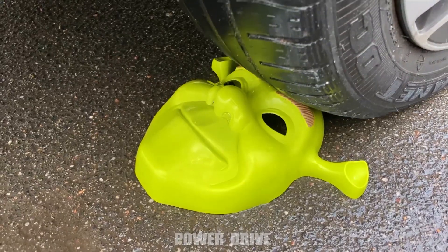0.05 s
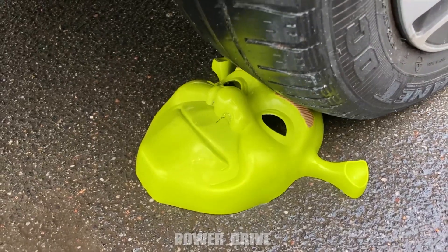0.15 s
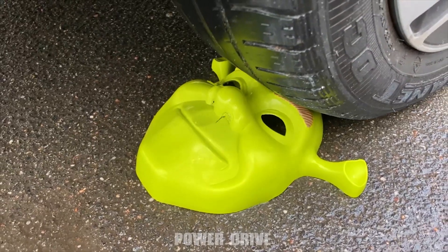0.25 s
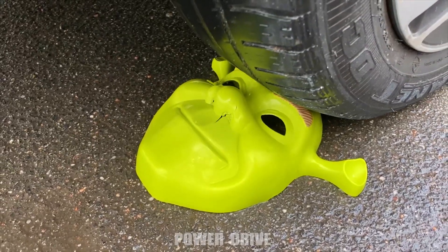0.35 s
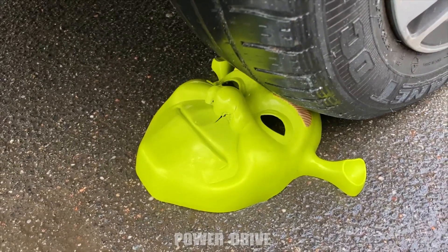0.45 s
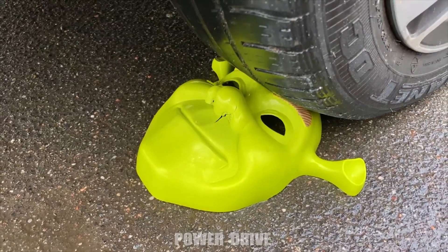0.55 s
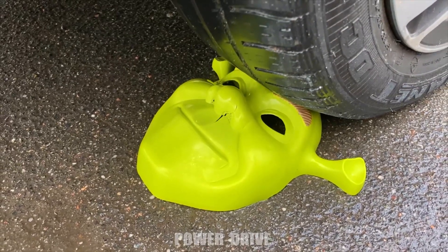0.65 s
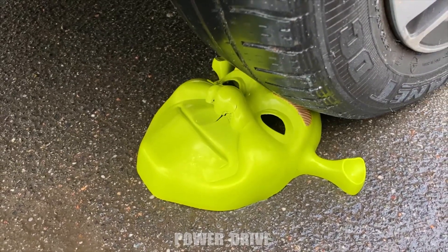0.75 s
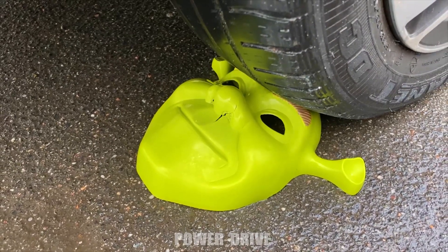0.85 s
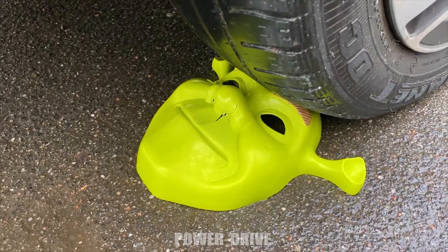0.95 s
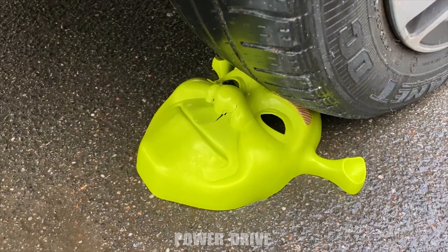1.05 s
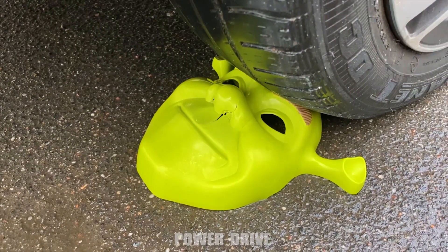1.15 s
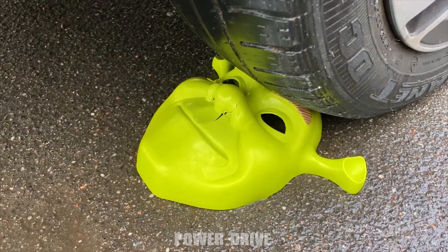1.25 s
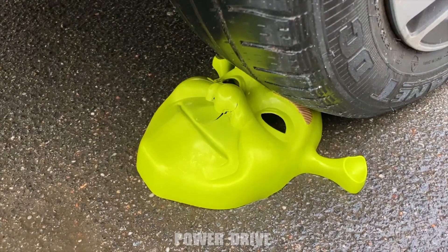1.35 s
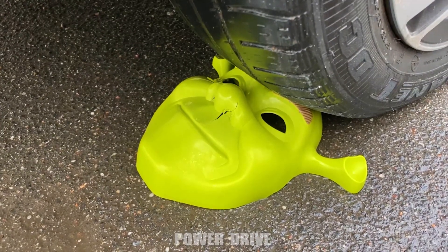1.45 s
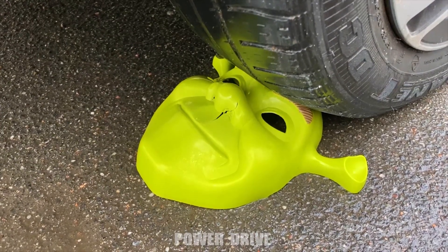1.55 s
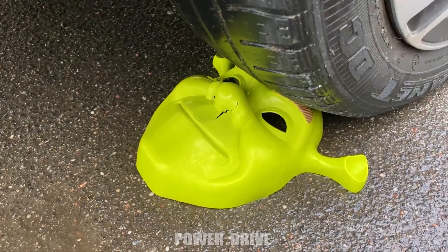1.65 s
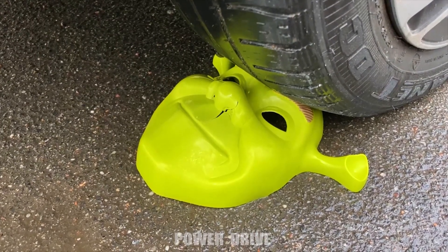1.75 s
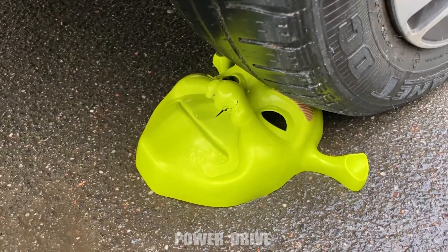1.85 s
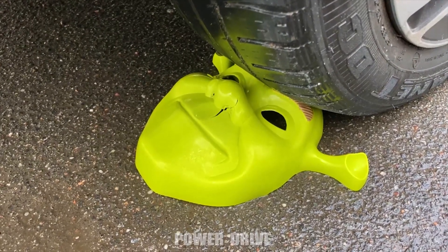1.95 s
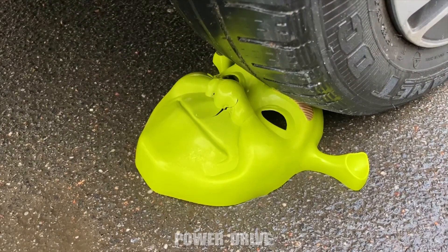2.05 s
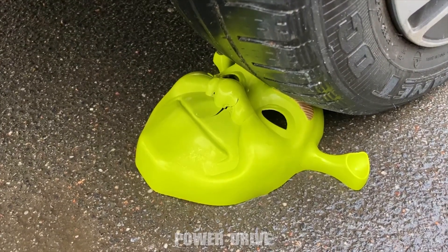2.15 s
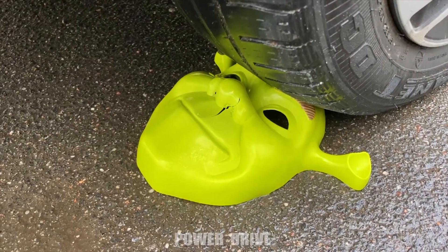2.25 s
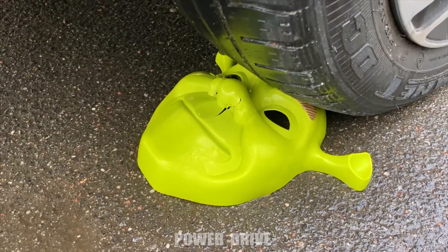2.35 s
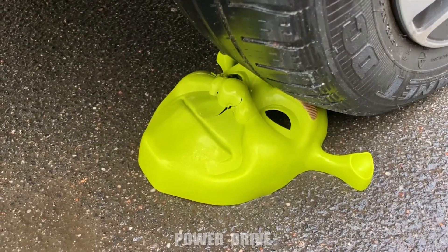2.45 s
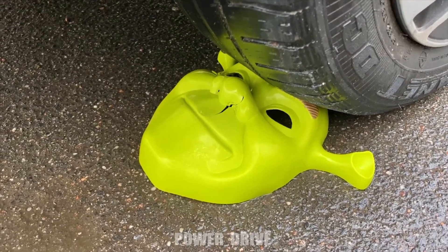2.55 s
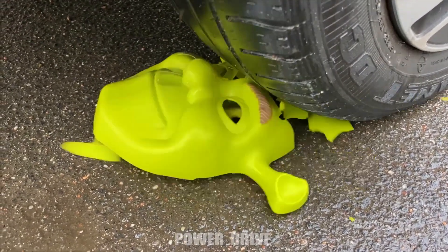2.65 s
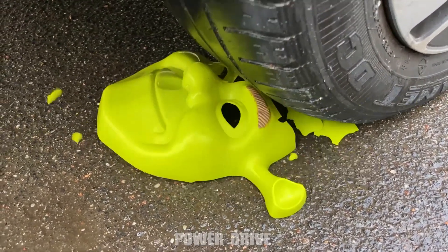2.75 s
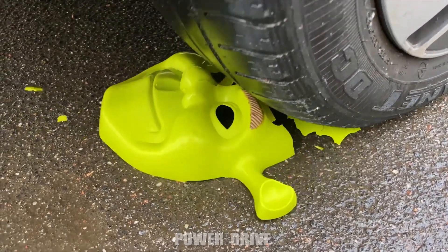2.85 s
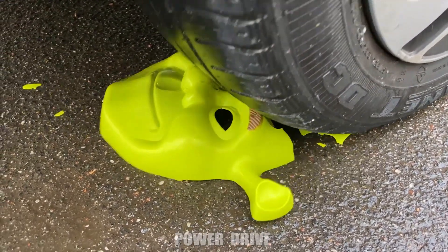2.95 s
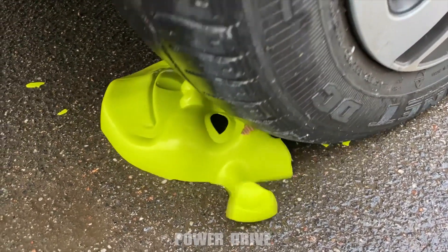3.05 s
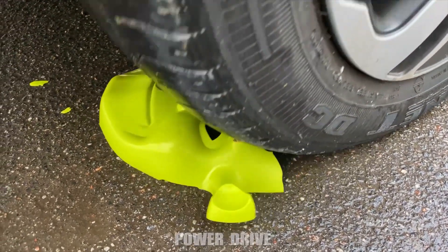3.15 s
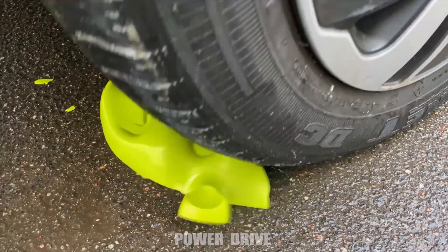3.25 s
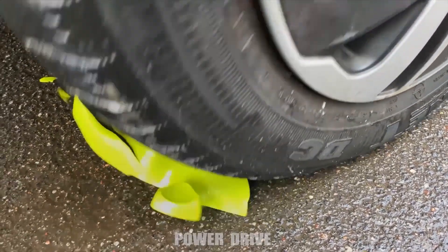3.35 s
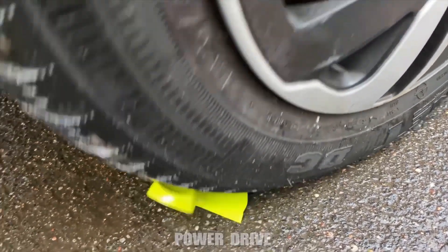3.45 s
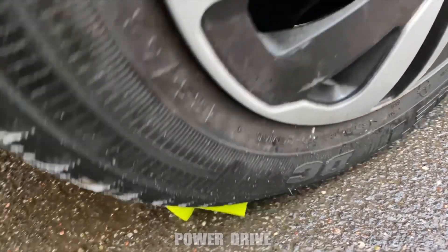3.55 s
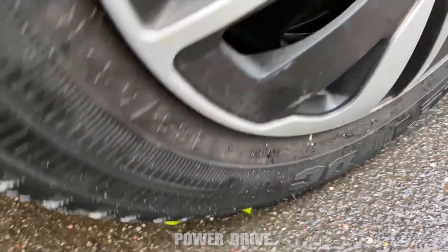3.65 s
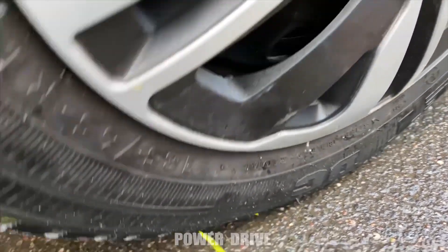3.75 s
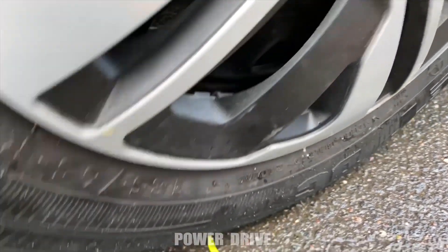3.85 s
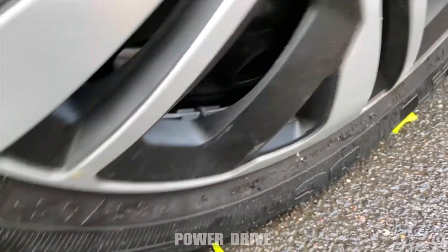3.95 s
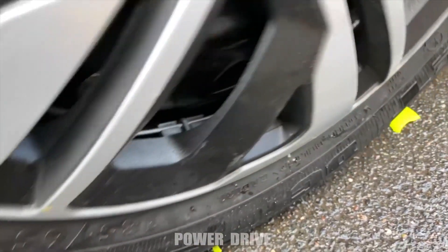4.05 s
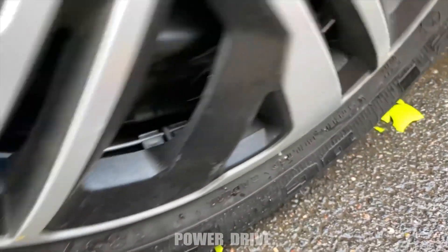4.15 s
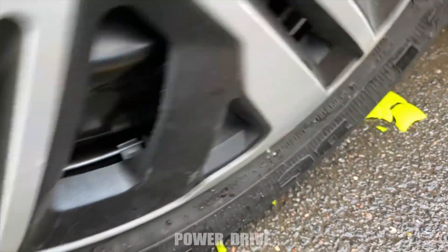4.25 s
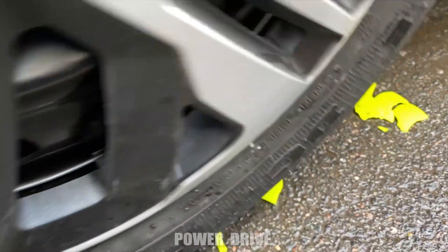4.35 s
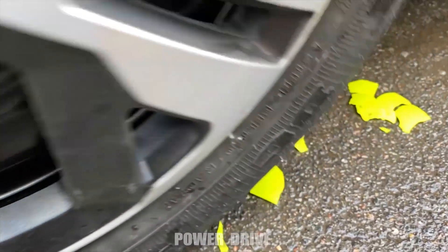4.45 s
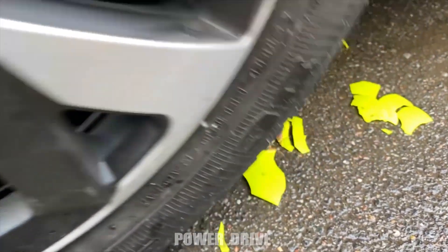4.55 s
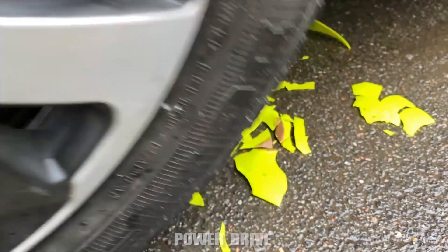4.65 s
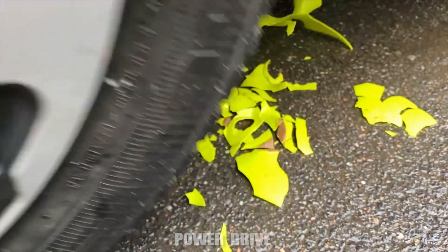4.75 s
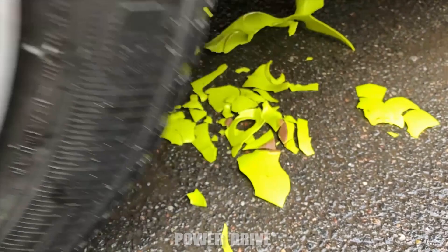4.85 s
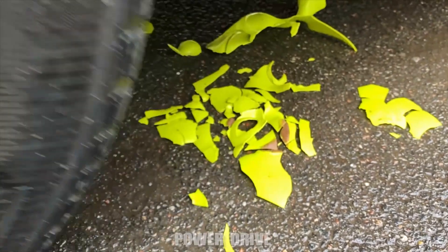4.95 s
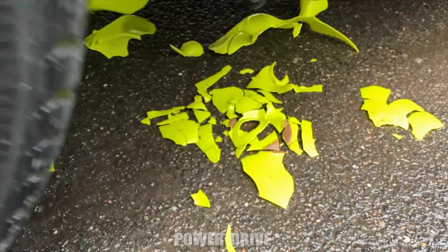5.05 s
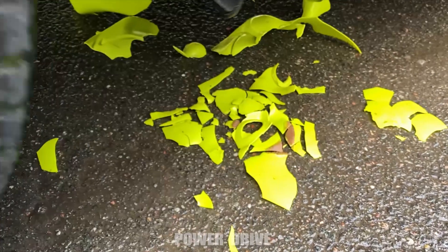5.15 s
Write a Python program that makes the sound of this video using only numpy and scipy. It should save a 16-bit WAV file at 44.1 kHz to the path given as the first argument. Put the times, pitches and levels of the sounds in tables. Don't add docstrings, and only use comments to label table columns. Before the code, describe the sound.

A car engine idles low while hard plastic snaps sharply, then collapses in a loud, clipping volley of cracks and fades to small crunching ticks.

```python
import sys
import numpy as np
from scipy import signal
from scipy.fft import rfft, irfft, next_fast_len
from scipy.io import wavfile
from scipy.ndimage import uniform_filter1d

SR = 44100
rng = np.random.default_rng(int(sys.argv[2]) if len(sys.argv) > 2 else 0)


def voltage_ratio(level):
    return 10 ** (np.asarray(level, float) / 20)


def transcribe(u):
    v = np.clip(np.atleast_2d(u).T, -1, 1)
    q = np.round(v * 32767).astype(np.int16)
    wavfile.write(sys.argv[1], SR, q)


N = 229481

# start_s, peak_db, thickness_db, t60_s (time to fade by 60 dB)
SNAPS = [(.181, -4, -8, 0.054), (.3328, 0, -11.5, 0.053), (.4146, 1, -9.5, .039), (.4274, -5.5, -13, 0.043),
         (2.5417, -2.5, -11, 0.032)]
# start_s, peak_db, thickness_db, t60_s
SEAM = [(1.6379, -3, -12.5, 0.036)]
# start_s, peak_db, thickness_db, t60_s
COLLAPSE = [(2.6574, 0.5, -8, 0.048), (2.6811, 3, -11, 0.031), (2.6921, -7.5, -5, 0.018),
            (2.699, -32, -15, .045), (2.7302, -17.5, -19, 0.032), (2.7361, -21, -14, .045),
            (2.7524, -28, -7, 0.042), (2.7828, -24.5, -23, 0.071), (2.8643, -1.5, -1.5, 0.089),
            (2.9187, -14, -1.5, 0.027)]
# start_s, peak_db, thickness_db, t60_s
VOLLEY = [(3.0195, -10, -4.5, 0.038), (3.0304, -8.5, -3.5, 0.083), (3.0404, -6, -13, .049),
          (3.0601, -5, -9.5, .075), (3.0724, -7.5, -10.5, 0.05), (3.0845, -5.5, -17, 0.036),
          (3.1012, -9.5, -8.5, 0.043), (3.132, -10, -5, .041), (3.1458, -1.5, -28, 0.033),
          (3.1584, -13.5, -17, 0.032), (3.1945, -15.5, -4, 0.032), (3.2064, -18, -7, 0.042),
          (3.2226, -17, -7.5, 0.062), (3.2464, -19.5, -0.2, 0.045), (3.2762, -8, -6, 0.037),
          (3.2924, -28, -2, .03), (3.3276, -4.5, -12, 0.042), (3.3489, -0.5, -9.5, 0.077),
          (3.4065, -5, -15, 0.02), (3.4192, -17.5, -12.5, 0.042), (3.439, 1, -12.5, .057),
          (3.4615, -2.5, -20, 0.054)]
# start_s, peak_db, thickness_db, t60_s
CHIPS = [(3.5211, -22, -9, 0.089), (3.5774, -24, -10, .026), (3.586, -14.5, -10.5, 0.047),
         (4.56, -8.5, -10.5, 0.024)]
# start_s, peak_db, thickness_db, t60_s
CRUNCHES = [(2.85, -26, -5, 0.049), (3.271, -25, -11, 0.057), (3.736, -46, 11, .086),
            (4.015, -46.5, 10, 0.091), (4.035, -46, 11, 0.088), (4.38, -46, 7, .1)]
# start_s, peak_db, thickness_db, t60_s
LUMPS = [(4.089, -46.5, 7.5, 0.12), (4.25, -45, 9, .061), (4.29, -42, 8.5, 0.051)]
# start_s, peak_db, thickness_db
TICKS = [(3.691, -27, -11), (3.7464, -32, 3), (3.7596, -30, 6), (3.7983, -33, 1), (3.8287, -36, 3),
         (4.0064, -28.5, -5.5), (4.0292, -35.5, 10), (4.0819, -38, 4), (4.0994, -40.5, 8), (4.1334, -43, 9),
         (4.193, -45, -4), (4.211, -36, 3), (4.2462, -34, -8), (4.2859, -31.5, 6.5), (4.337, -27, 2),
         (4.365, -32, 6.5), (4.4026, -31, 4.5), (4.4515, -30, 3), (4.5097, -33.5, 7.5)]
# start_s, peak_db, thickness_db
SPLINTERS = [(.0463, -38.5, -11), (3.708, -30, -7), (3.715, -24, -8), (3.7324, -30, 3), (3.8775, -31, -12),
             (4.2173, -32, 3), (4.371, -25.5, 2), (4.8804, -35, -14)]
TICK_T60_S, SPLINTER_T60_S = .021, 0.014

# body_db against mid, fizz_db against crack
SHELL_KIND, SEAM_KIND, COLLAPSE_KIND = (-1.45, -5.5), (-15, -7), (-4.5, -8)
VOLLEY_KIND, CHIP_KIND = (-0.84, -6.5), (-19, -14.5)
CRUNCH_KIND, LUMP_KIND = (-7.5, -7), (-.8, -12.5)
TICK_KIND, SPLINTER_KIND = (-8.5, -11), (-11, 1.3)
FIZZ_LOSS = 0.14

# pitch_hz, level_db (per Hz)
CRACK_COLOUR = [(88, -26), (150, -7), (406, -11.5), (555, -9), (871, -4.5), (1340, -7), (1530, -2.5),
                (2550, -0.5), (2760, -3), (6770, 5.5), (9080, -1), (11900, 2), (16000, -9)]
BAND_EDGES_HZ = [130, 1500, 4000, 8000]

# start_s, level_db
GRIND = [
    [(2.72, -38), (2.976, -48), (3.09, -37), (3.272, -41.5), (3.402, -25.5), (3.538, -49.5), (3.66, -44.5)],
    [(3.68, -49), (4.012, -52.5), (4.466, -55.5), (4.56, -57)],
]
# body_db, mid_db, fizz_db
GRIND_COLOUR_DB = [(-3, 1.5, 0), (-3, 2.1, 4.5)]

# start_s, pitch_hz, level_db, t60_s
RINGS = [(.183, 530, -25, 0.06), (1.638, 178, -24.5, 0.032), (2.543, 510, -27, 0.048),
         (3.585, 2730, -28.5, 0.032), (.183, 680, -21, 0.047), (0.182, 1870, -23, 0.044),
         (.334, 538, -25, 0.06), (.334, 6240, -11.5, 0.077), (.416, 525, -20.5, 0.091),
         (1.638, 530, -27, 0.055), (1.639, 2880, -18.5, 0.026), (1.638, 3600, -21, 0.032),
         (2.661, 58.4, -21, 0.069), (2.674, 109, -46, 0.042), (2.68, 195, -13.5, 0.043),
         (2.867, 1452, -17, 0.066), (2.92, 2690, -26, 0.068), (3.031, 748, -10, 0.038),
         (3.021, 1550, -17, .04), (3.062, 1293, -23, 0.033), (4.098, 997, -39.5, .03),
         (4.286, 1245, -36, 0.041), (3.07, 106, -29.5, 0.087), (3.224, 1800, -21, .03),
         (3.279, 1470, -18.5, 0.044), (3.351, 75, -27, 0.075), (3.439, 100, -18.5, 0.079),
         (3.586, 2270, -28, 0.034), (4.561, 2620, -30, .03), (4.561, 4660, -26, .03)]
# start_s, pitch_hz, level_db, t60_s
HUM = [(2.733, 231, -39.5, .7)]

# start_s, pressure (1 = full scale), rise_s, hold_s, release_s
PUFFS = [(2.658, -.7, .003, .06, .024), (2.706, -.7, .012, .004, .003), (2.765, .42, .055, .06, .13),
         (3.338, -.57, .015, .037, .01), (3.41, .02, .03, 0, .006), (3.442, -.13, .013, 0, .04)]

# start_s, firing_rate_hz
FIRING = [(0, 23.4), (1.48, 23.8), (2.2, 24.2), (2.5, 25.9), (3.0, 28.6), (3.59, 24.1), (4.5, 23.4),
          (5.2, 22.7)]
# multiple of the firing rate, level_db
FIRING_ORDERS = [(.5, -1), (1, 2.5), (2, -21), (3, -15.5)]
# pitch_hz, level_db (per Hz)
ENGINE_COLOUR = [(22, -41), (38, 3), (49, -12), (102, -13), (128, -20.5), (280, -22.5), (318, -28),
                 (389, -33), (420, -27.5), (629, -31), (2660, -42.5), (5530, -41), (12100, -39.5),
                 (16000, -62)]
# pitch_hz, width_hz, level_db
ENGINE_BAY = [(150, 14, -53), (323, 12, -53), (640, 25, -60), (5600, 400, -61), (12300, 300, -65)]
ENGINE_DB, FIRING_DB = -35, -28.5
IDLE_HZ, SWELL_DB_PER_HZ = 24.6, -0.18

# start_s, end_s, level_db
STALL = (3.451, 3.462, -23.5)
RAIL = .55
COUPLING_S, EDGE_HZ = .15, 15800


def evened(x):
    return x / np.sqrt(np.mean(x ** 2) + 1e-20)


def curve(rows):
    s, *columns = np.transpose(rows)
    return [np.interp(np.arange(N) / SR, s, column) for column in columns]


def coloured(x, points):
    f, db = np.transpose(points)
    hz = np.fft.rfftfreq(len(x), 1 / SR)
    gain = voltage_ratio(np.interp(np.log(hz + 1), np.log(f), db))
    return irfft(rfft(x) * gain, len(x))


def fracture(size):
    sizes = voltage_ratio(2.53 * rng.exponential(1, size))
    return evened(coloured(rng.standard_normal(size) * sizes, CRACK_COLOUR))


def shards(x, db, spread):
    hz = np.fft.rfftfreq(len(x), 1 / SR)
    pitch = 900 * 14 ** rng.random((16, 1))
    ringing = (1 / (1 + 2j * spread * (hz / pitch - 1))).sum(0)
    return irfft(rfft(x) * (1 + voltage_ratio(db) * ringing), len(x))


def tilted(x, body_db, mid_db, fizz_db):
    hz = np.fft.rfftfreq(len(x), 1 / SR)
    above = [1 / (1 + (edge / (hz + 1)) ** 8) for edge in BAND_EDGES_HZ] + [0]
    bands = [evened(irfft(rfft(x) * (low - high), len(x))) for low, high in zip(above, above[1:])]
    body, mid, crack, fizz = bands
    return voltage_ratio(body_db) * body + voltage_ratio(mid_db) * mid + crack + voltage_ratio(fizz_db) * fizz


def pieces(rows, kind, *t60):
    hollow_db, fizz_db = kind
    return [(s, db, thick + hollow_db, thick, fizz_db - FIZZ_LOSS * thick, *ring, *t60)
            for s, db, thick, *ring in rows]


def snaps(rows, crest_db):
    out, t = np.zeros(N + 6144), np.arange(6144) / SR
    for s, db, *colour_db, t60 in rows:
        shaken = shards(fracture(len(t)), db=-5., spread=20.)
        swarm = tilted(shaken, *np.add(colour_db, crest_db))
        fade = voltage_ratio(-60 * t / max(t60, .004)) * np.minimum(t / 0.00078, 1)
        out[round(s * SR):][:len(t)] += voltage_ratio(db - 5.0) * swarm * fade
    return out[:N]


def breaking_shell():
    rows = sorted(pieces(SNAPS, SHELL_KIND) + pieces(SEAM, SEAM_KIND))
    rows += pieces(COLLAPSE, COLLAPSE_KIND) + pieces(VOLLEY, VOLLEY_KIND) + pieces(CHIPS, CHIP_KIND)
    return snaps(rows, crest_db=7.5)


def ringing_shell():
    out, t = np.zeros(N + SR), np.arange(SR // 2) / SR
    for s, hz, db, t60 in RINGS + HUM:
        main = np.sin(2 * np.pi * hz * t)
        partner = 0.35 * np.sin(2 * np.pi * (1.02 * hz * t + rng.random()))
        fade = voltage_ratio(db + 9.5 - 60 * t / t60) * np.minimum(t / 0.0021, 1)
        out[round(s * SR):][:len(t)] += (main + partner) * fade
    return out[:N]


def debris():
    rows = sorted(pieces(TICKS, TICK_KIND, TICK_T60_S) + pieces(SPLINTERS, SPLINTER_KIND, SPLINTER_T60_S))
    rows += sorted(pieces(CRUNCHES, CRUNCH_KIND) + pieces(LUMPS, LUMP_KIND))
    return snaps(rows, crest_db=6.5)


def grind():
    out = np.zeros(N)
    for rows, colour_db in zip(GRIND, GRIND_COLOUR_DB):
        start = round(rows[0][0] * SR)
        size = next_fast_len(round((rows[-1][0] - rows[0][0]) * SR))
        pressure = voltage_ratio(curve(rows)[0][start:start + size])
        clicks = (rng.random(size) < 250 / SR) * voltage_ratio(2.4 * rng.exponential(1, size))
        bursts = signal.lfilter([1], [1, -np.exp(-1 / (0.0084 * SR))], clicks)
        clumps = evened(.5 + evened(bursts))
        rubble = tilted(fracture(size), *colour_db)
        out[start:start + size] = pressure * rubble * clumps * signal.windows.tukey(size, .03)
    return out


def puffs():
    t, out = np.arange(N) / SR, np.zeros(N)
    for s, pressure, rise, hold, release in PUFFS:
        leak = np.exp(-np.maximum(t - s - rise - hold, 0) / release)
        out += pressure * np.clip((t - s) / rise, 0, 1) * leak
    return out


def underside(x):
    t = np.arange(SR // 3) / SR
    taps = rng.choice([-1., 1.], len(t)) * (rng.random(len(t)) < 4000 / SR)
    dull = signal.lfilter([.45], [1, -.55], taps)
    early = dull * voltage_ratio(-60 * t / 0.08) * np.clip((t - .01) / 0.003, .12, 1)
    late = voltage_ratio(-32.5) * dull * voltage_ratio(-60 * t / 0.47)
    tail = early + late
    return signal.fftconvolve(x, tail / np.linalg.norm(tail))[:N]


def wander(rate_hz):
    t = np.arange(0, N + 256, 256) / SR
    waves = [np.sin(2 * np.pi * (f * t + rng.random())) / np.sqrt(f) for f in np.geomspace(.3, rate_hz, 24)]
    return np.interp(np.arange(N) / SR, t, evened(sum(waves)))


def resonate(x, hz, width):
    r = np.exp(-np.pi * width / SR)
    return 2 * signal.lfilter([1 - r], [1, -r * np.exp(2j * np.pi * hz / SR)], x).real


def engine():
    hz = curve(FIRING)[0]
    turns = np.cumsum(hz * (1 + 0.016 * wander(6.66))) / SR
    throb = np.zeros(N)
    for multiple, db in FIRING_ORDERS:
        throb += voltage_ratio(db + 1.53 * wander(7.8)) * np.sin(2 * np.pi * (multiple * turns + rng.random()))
    noise = rng.standard_normal(N) * voltage_ratio(.8 * np.cos(2 * np.pi * turns) + 0.48 * wander(9.1))
    bay = sum(voltage_ratio(db) * evened(resonate(noise, f, width)) for f, width, db in ENGINE_BAY)
    wash = voltage_ratio(ENGINE_DB) * evened(coloured(noise, ENGINE_COLOUR)) + bay
    return np.sqrt(2) * voltage_ratio(FIRING_DB) * throb + wash * voltage_ratio(SWELL_DB_PER_HZ * (hz - IDLE_HZ))


def scene():
    cracks = breaking_shell() + debris() + grind() + ringing_shell()
    mix = cracks + voltage_ratio(-10.5) * underside(cracks) + engine() + puffs()
    return mix[None]


def band_limit(x):
    return signal.sosfilt(signal.butter(12, 16970, fs=SR, output="sos"), x)


def record(dry):
    t, (start, end, stall_db) = np.arange(N) / SR, STALL
    slow = uniform_filter1d(dry, 441, axis=1)
    deaf = uniform_filter1d(1. * ((t > start) & (t < end)), 40)
    clipped = np.clip(slow + (dry - slow) * voltage_ratio(stall_db * deaf), -RAIL, RAIL)
    leak = np.exp(-1 / (COUPLING_S * SR))
    coupled = signal.lfilter([1, -1], [1, -leak], clipped)
    treble_cut = signal.firwin(255, EDGE_HZ, window=("kaiser", 6), fs=SR)
    limited = signal.oaconvolve(coupled, treble_cut[None], "same")
    return band_limit(limited)


dry = scene()
out = record(dry)
transcribe(out)
```